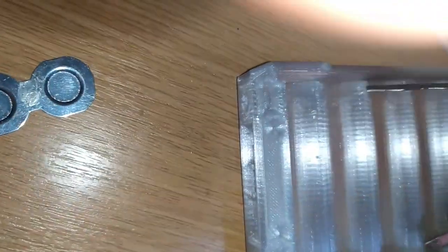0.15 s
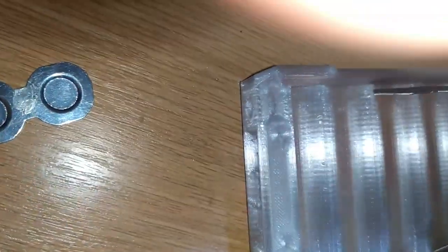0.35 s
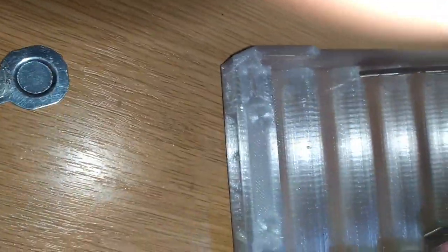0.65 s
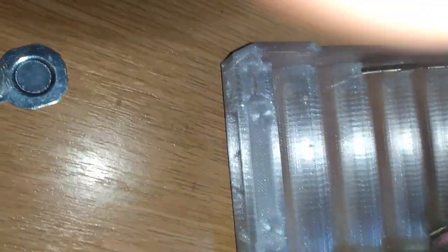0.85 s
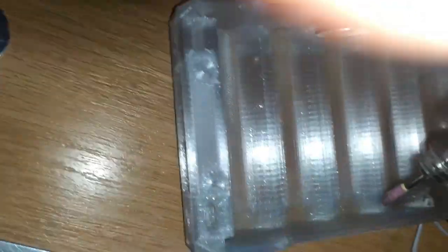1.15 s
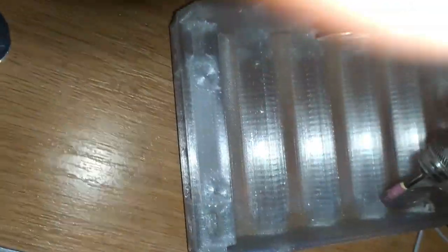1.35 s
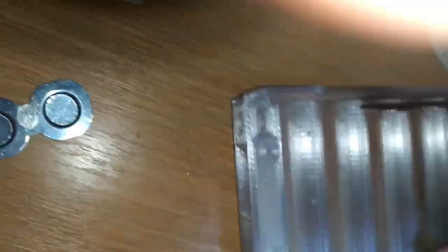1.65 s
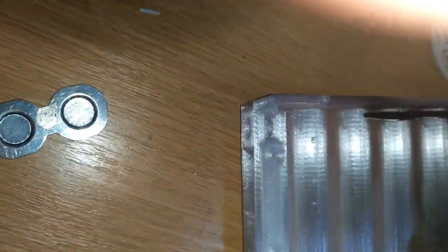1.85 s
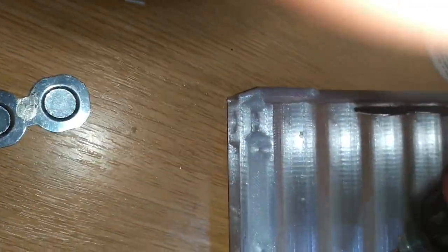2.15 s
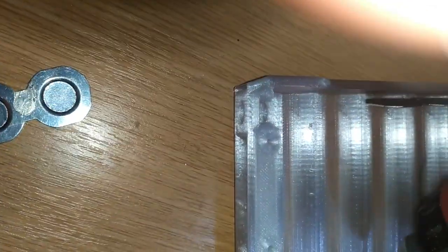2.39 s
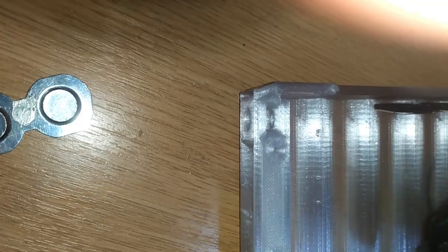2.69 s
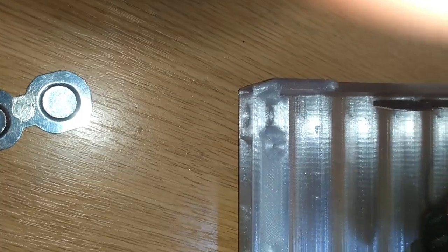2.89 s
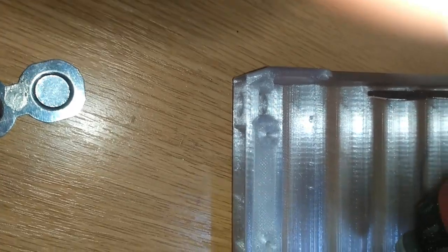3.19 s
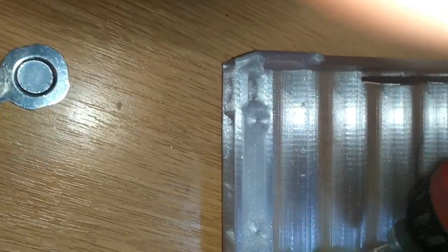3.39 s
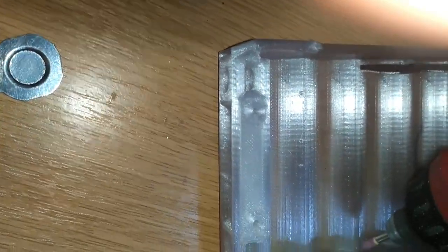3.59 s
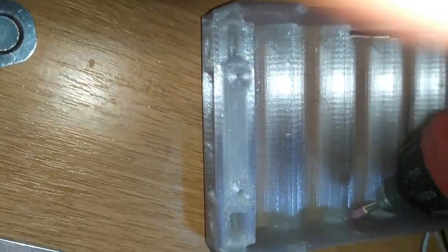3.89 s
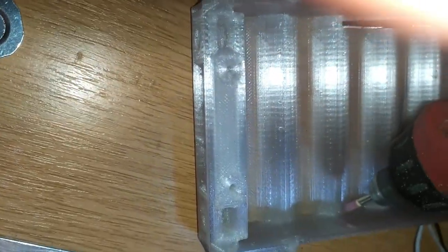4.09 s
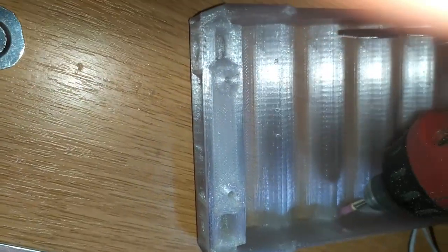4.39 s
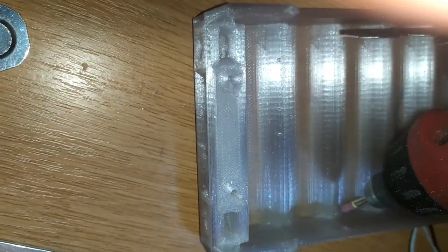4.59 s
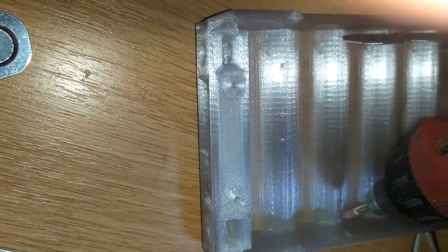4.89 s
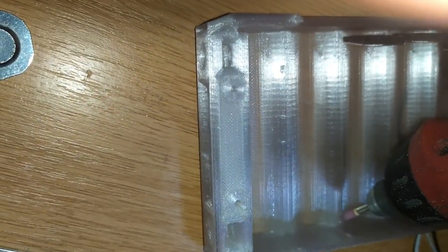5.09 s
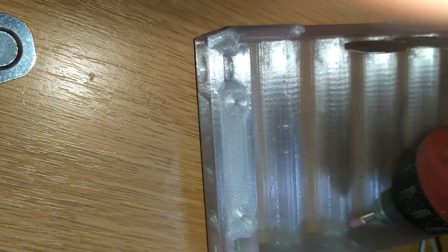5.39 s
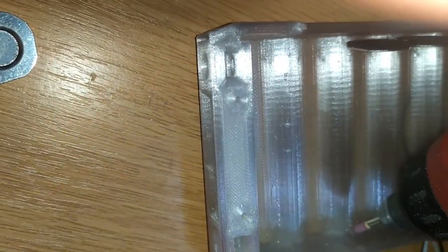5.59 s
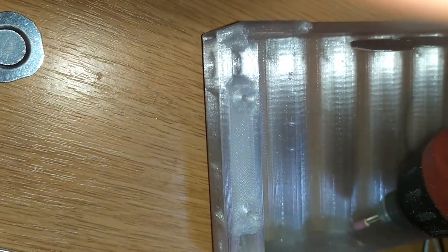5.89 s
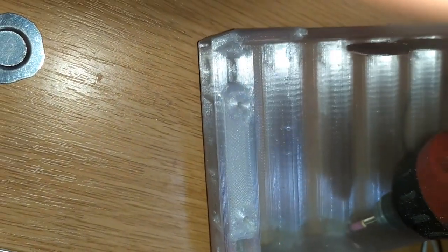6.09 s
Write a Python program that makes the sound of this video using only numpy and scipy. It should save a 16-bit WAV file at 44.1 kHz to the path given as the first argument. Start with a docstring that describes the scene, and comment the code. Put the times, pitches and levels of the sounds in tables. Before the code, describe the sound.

A small handheld motor snaps on with a gust of air, climbs to a raspy, buzzing whine, and its stone rasps plastic in two bursts.

```python
"""Small grinding tool over a bench

After some handling and a few clicks, a small rotary tool crackles into life and whines up to about
430 turns a second, puffing air at the left microphone; its stone is then pressed twice on a plastic shell.
Tones locked to one shaft angle make the whine and the knocking of the stone. Coloured noise makes the
brushes, air and room; scattered tiny impacts add sparks and chips, and short snaps and rings the clicks."""
import sys
import numpy as np
from scipy import signal
from scipy.fft import rfft, irfft
from scipy.io import wavfile
from scipy.ndimage import uniform_filter1d

SR = 44100
rng = np.random.default_rng(int(sys.argv[2]) if len(sys.argv) > 2 else 0)


def pcm_store(signal):
    """Save signal as 16-bit PCM."""
    levels = np.round(np.clip(np.atleast_2d(signal), -1, 1) * 32767)
    wavfile.write(sys.argv[1], SR, levels.astype(np.int16).T)


N = 275625
TIME = np.arange(N) / SR  # seconds

# All colours are relative levels, because the noise is levelled afterwards or the filter peak is set to 1.
# colour of the quiet room: [f/Hz, left level/dB, right level/dB]
ROOM_COLOUR = [(25, -33, -9), (48, 5, 0), (70, 2, -10), (100, -8, 1), (140, -19, -12.5), (220, -16, -14),
               (400, -22.5, -24), (1000, -30, -29), (16000, -37, -34)]
# colour of the draught: [f/Hz, left level/dB, right level/dB]
DRAUGHT_COLOUR = [(20, -45, -62), (38, -16, -27), (63, 7.5, -26), (109, 0, -15), (204, -6.5, -38),
                  (400, -20.5, -47), (1000, -54, -63)]
# tilt of the hand-held tool; it lifts the right side of the whine and lowers hum and draught: [t/s, tilt/dB]
TOOL_TILT = [(1.4, -1), (2.3, 2), (2.8, 0), (3.95, -2), (4.5, -4), (5.3, 0.5), (5.62, -7), (6.25, -3.5)]
# fingers slide on the shell: [middle t/s, half length/s, relative level/dB]
FINGER_SLIDES = [(0.025, 0.033, -52.5), (.205, .018, -63), (.4, .42, -77), (.57, 0.066, -67.5),
                 (.98, .1, -72)]
# colour of the rubbing: [f/Hz, left level/dB, right level/dB]
RUB_COLOUR = [(200, -15, -7), (1200, -11, -10), (2300, -10, -5), (3500, -3, 2), (5000, -9, -8),
              (8000, -3, -4), (15000, -11, -14)]
# soft bumps of the hand: [t/s, peak level/dB, f/Hz, time to fall by 60 dB/s]
HAND_BUMPS = [(.232, -53, 318, 0.049), (1.044, -44, 105, 0.083)]
# clicks of plastic, switch and first brush sparks:
# [t/s, peak level/dB, left minus right/dB, ring level against the snap/dB, time to fall by 60 dB/s]
CLICKS = [(.251, -49, -6, -12, .02), (.333, -49, 2, -10, .02), (.411, -53, -12, -7, 0.036),
          (0.562, -42, -1, -12, .03), (.841, -54, -8, -6, .04), (.901, -38, 13, -3, .025),
          (0.9093, -32.5, 12, 1, 0.024), (0.9124, -16.5, 9, -20, 0.055), (.9742, -24, -23, -29, .012),
          (1.033, -42, -12, -12, .02), (1.0427, -25, -23, -29, 0.045), (1.244, -46.5, -8, -16, .02),
          (1.326, -48, -7, -11, 0.04), (1.398, -23.5, 4, -7, 0.036), (1.4235, -20, 1, -22, .02),
          (1.433, -16, -5, -11, 0.024), (1.4433, -15.5, -15, -21, 0.017), (1.4645, -28, 2, -32, .02),
          (1.4747, -5, 4, -18, .02)]
# colour of the clicks: [f/Hz, left level/dB, right level/dB]
CLICK_COLOUR = [(100, -29, -12), (600, -23, 1), (1500, -12, 4), (2780, 4, 7.5), (5000, 0.5, -2),
                (8000, 3, -6), (11900, -2.5, -8), (16000, -17, -13)]
# the shaft gathers speed in a quick, a slow and a creeping stage: [gain/turns per s, time constant/s]
SPIN_UP_STAGES = [(245.44, .132), (165.27, .6208), (49.64, 9.0)]
# resonances and a dead spot of the housing, swept by the vane whistle: [f/Hz, half width/Hz, lift/dB]
HOUSING_LIFTS = [(4050, 280, 15), (5450, 360, -4), (5830, 115, 11.5)]
# colour of brushes and fan: [f/Hz, left level/dB, right level/dB]
RUSH_COLOUR = [(30, -70.5, -102), (120, -79, -68.5), (197, -69.5, -75), (289, -62, -69), (550, -66.5, -64),
               (700, -51.5, -61.5), (920, -57.5, -59.5), (1380, -57, -52), (2330, -54, -50),
               (2490, -57.5, -55), (2980, -53.5, -46), (4020, -49.5, -48.5), (5260, -55.5, -55.5),
               (6560, -50.5, -50.5), (6880, -57.5, -56.5), (8200, -51, -52.5), (9500, -59, -57.5),
               (10200, -61, -60.5), (15900, -63.5, -67)]
# colour of the sparks: [f/Hz, left level/dB, right level/dB]
SPARK_COLOUR = [(300, -47, -51), (730, -8, -4), (2000, 0, -7.5), (4000, -3, -20), (6000, -20, -2),
                (8700, 8.5, 5), (11000, 0.5, -3), (13500, -1.5, -12), (16000, -2, -33)]
# overtones of the shaft, levels within the whine:
# [multiple (rounded in use), left level/dB, right level/dB, own fall at half speed/dB]
SHAFT_OVERTONES = [(1.85, -30.5, -32.5, 5), (3.04, -34.5, -28.5, 6), (4, -32.5, -27.5, 10),
                   (5, -30.5, -30.5, 9), (6, -29, -29, -1.5), (7, -37, -18, 45), (8, -22.5, -27, 19),
                   (9, -30, -32, -3), (11, -29.5, -34, 15), (14, -28, -41, 38), (17, -32, -49, 10),
                   (19, -40, -48, 20), (20, -47, -45, 20), (22, -31, -30, 22), (23, -32.5, -49, 18),
                   (24, -35, -34.5, -4)]
# the stone is pressed on the plastic: [start t/s, end t/s, attack/s, pressure 0-1]
PRESSES = [(4.74, 5.396, .018, 0.45), (5.778, 6.25, 0.42, 0.44)]
# the stone catches and tears out more: [middle t/s, half length/s, added pressure]
BITES = [(4.752, 0.013, .35), (5.02, .05, .15), (5.133, 0.025, 0.22), (5.22, 0.031, 0.36),
         (5.408, .014, 0.22), (6.035, 0.027, .25), (6.203, .022, 0.33)]
# how hard the stone chatters, one list for each press: [t/s, relative level/dB]
CHATTER = [
    [(4.73, -30), (4.75, -30), (4.784, -31), (4.832, -26), (4.978, -22.5), (5.058, -26), (5.08, -45),
     (5.11, -39), (5.172, -49), (5.204, -40), (5.394, -22.5), (5.442, -38), (5.47, -30)],
    [(5.78, -40), (5.818, -38), (5.852, -36), (5.886, -26), (5.962, -37), (6.004, -26), (6.078, -28),
     (6.1, -24.5), (6.174, -38), (6.25, -23)],
]
# overtones of the stone knocking once a turn: [multiple, left level/dB, right level/dB], before the chatter
KNOCK_OVERTONES = [(3, -31.5, -25.5), (4, -27.5, -24.5), (5, -23.5, -15), (6, -27, -32), (7, -42, -25),
                   (9, -49, -27), (12, -27, -35), (14, -39, -34), (15, -28, -44), (18, -23.5, -39),
                   (22, -27, -34)]
# colour of tearing chips: [f/Hz, left level/dB, right level/dB]
CHIP_COLOUR = [(185, -14.5, -4.5), (315, 4.5, -2), (438, -33, 3), (795, -14, 2.5), (1430, 2, -7.5),
               (1870, 6, 20), (2160, 10, 1), (2740, -6, 6.5), (3560, -47, -25), (5240, -14, 11.5),
               (6760, 6, 5.5), (8200, 7, 12), (9900, 4, 8.5), (11200, -6, -1), (16000, -25, -15)]

# one gust: the fan's jet sweeps across the left microphone and makes its air cavity swing
GUST_S, GUST_DB, GUST_ATTACK_S, GUST_FADE_DB_PER_S = 1.552, -22, 0.0051, 229
# the swing is set against the gust level
SWING_HZ, SWING_LEFT_DB, SWING_RIGHT_DB = 62.5, 5, -25
# for each part: level at full speed, and the fall towards standstill
DRAUGHT_DB, DRAUGHT_FALL_DB = -45, 11
VANES_DB, VANES_FALL_DB = -30, 19.5
RUSH_DB, RUSH_FALL_DB, RUSH_PRESSED_DB = -14.5, 19.5, -0.4  # last one: change at pressure 1
WHINE_DB, WHINE_FALL_DB = -0.47, 96
# unbalance hum at full speed, and the power of the speed that it grows with
HUM_DB, HUM_POWER = -25, 3.24
# share of the tool's tilt that hum and draught follow
HUM_TILT_SHARE, DRAUGHT_TILT_SHARE = 0.36, 0.81
# full speed is in turns per second
SWITCH_ON_S, SHAFT_STARTS_S, FULL_SPEED = 1.384, 1.406, 432
# the first long press drags the shaft down a little
SAG_AT_S, SAG_WIDTH_S, SAG_TURNS_PER_S = 5.37, .27, 4.1
# the motor noise swells in after switching on
START_DEPTH_DB, START_SWELL_S = 28, 0.023
# phase shake of the vane whistle in radians: at full speed, and added at standstill
VANES_ROUGH, VANES_ROUGH_SLOW = .6, 3.6
# sparks follow the motor current and a power of the speed
SPARKS_DB, SPARKS_POWER = -6.5, 2.02
# commutator buzz within the whine: level of the lowest tone, fall from one to the next, waver of each
BUZZ_DB, BUZZ_STEP_DB, BUZZ_WAVER_DB = -51, .45, 2.5
LEFT_EARLIER_S = 0.0003965  # the left microphone is nearer to the tool
BENCH_ECHO_DB = -16  # each echo of the rush, against the direct sound
RELEASE_S = 0.2  # the stone lets go
CHATTER_GAIN_DB = 23
CUTOFF_HZ = 15800


def from_db(db):
    """Turn decibels into a plain gain."""
    return np.exp(np.asarray(db) * (np.log(10) / 20))


def rms_one(x):
    """Scale a sound to unit power."""
    return x / np.sqrt(np.mean(x ** 2) + 1e-20)


def swell(middle_s, width_s):
    """A smooth rise and fall of height 1."""
    return np.exp(-((TIME - middle_s) / width_s) ** 2)


def drift(rate):
    """Smooth random wander of spread 1 that changes about rate times a second."""
    # draw every 40th sample only, and drop the filter's first 2000 values while it settles
    pole = np.exp(-80 * np.pi * rate / SR)
    noise = rng.standard_normal(N // 40 + 2002)
    slow = signal.lfilter([1], [1, -2 * pole, pole * pole], noise)[2000:]
    return np.interp(np.arange(N) / 40, np.arange(len(slow)), rms_one(slow))


def stereo_noise():
    """Independent hiss on each side."""
    return rng.standard_normal((2, N))


def response(colour, size=8192):
    """Turn a left and right colour into filters that act without delay (minimum phase)."""
    hz, *sides = np.transpose(colour)
    grid = np.log(np.maximum(np.arange(size // 2 + 1) * SR / size, 1))
    curves_db = [np.interp(grid, np.log(hz), side) for side in sides]
    cepstrum = irfft(np.log(from_db(curves_db)))
    # fold the later half onto the earlier one, so nothing sounds before the hit
    cepstrum[:, 1:size // 2] *= 2
    cepstrum[:, size // 2 + 1:] = 0
    return irfft(np.exp(rfft(cepstrum)))


def through(x, impulse):
    """Filter both channels."""
    return signal.fftconvolve(x, impulse, axes=1)[:, :N]


def resonance(x, hz, width_hz):
    """One resonance that rings around hz, with gain 1 on top."""
    r = np.exp(-np.pi * width_hz / SR)
    feed = np.array([1, 0, -1]) * (1 - r * r) / 2
    return signal.lfilter(feed, [1, -2 * r * np.cos(2 * np.pi * hz / SR), r * r], x)


def grains(per_s, spread_db):
    """Random tiny impacts of uneven size, reaching the two microphones differently."""
    sizes = from_db(spread_db * np.minimum(rng.exponential(1, N), 4)) * stereo_noise()
    return rms_one(sizes * (rng.random(N) < per_s / SR))


def bench(x, echo_db, longest_s, count=10):
    """Early echoes off bench, shell and hand ripple the spectrum, differently on each side."""
    out = x.copy()
    for side in range(2):
        shares = rng.uniform(.1, 1, count)
        signs = rng.choice([-1, 1], count)
        for share, sign in zip(shares, signs):
            lag = 1 + int(share * longest_s * SR)
            out[side, lag:] += sign * from_db(echo_db) * x[side, :-lag]
    return rms_one(out)


def overtone(angle, left_db, right_db, waver_db, slip, slip_rate, lead=np.pi / 2):
    """A tone whose strength wavers and whose phase shakes; the left leads by some radians."""
    phase = angle + slip * drift(slip_rate) + rng.uniform(0, 2 * np.pi)
    strength = np.sqrt(2) * from_db(waver_db * drift(5.8))
    left = from_db(left_db) * np.sin(phase)
    right = from_db(right_db) * np.sin(phase - lead)
    return strength * np.array([left, right])


def tilt_db():
    """Tilt of the tool at every sample."""
    s, tilt = np.transpose(TOOL_TILT)
    return np.interp(TIME, s, tilt)


def shaft_speed():
    """Turns per second: the motor closes in on its top speed and sags under load."""
    age = np.maximum(TIME - SHAFT_STARTS_S, 0)
    free = sum(gain * (1 - np.exp(-age / lag_s)) for gain, lag_s in SPIN_UP_STAGES)
    return np.maximum(free - SAG_TURNS_PER_S * swell(SAG_AT_S, SAG_WIDTH_S), 0)


def slowness(speed):
    """1 at standstill, 0 at full speed; the motor current follows it."""
    return np.clip(1 - speed / FULL_SPEED, 0, 1)


def pressure():
    """Each press builds up, holds and lets go; now and then the stone bites deeper."""
    held = 0
    for start, end, attack_s, force in PRESSES:
        letting_go = np.exp(-np.maximum(TIME - end, 0) / RELEASE_S)
        held += force * np.clip((TIME - start) / attack_s, 0, 1) * letting_go
    return held + sum(force * swell(s, width_s) for s, width_s, force in BITES)


def room():
    """The low rumble of the quiet room: steady coloured noise."""
    return from_db(-62.5) * rms_one(through(stereo_noise(), response(ROOM_COLOUR)))


def draught(speed):
    """Lumpy air noise from the fan, growing with its speed, and one gust that swings an air cavity."""
    level_db = DRAUGHT_DB - DRAUGHT_FALL_DB * slowness(speed) - DRAUGHT_TILT_SHARE * tilt_db()
    steady = (speed > 0) * from_db(level_db)
    age = TIME - GUST_S
    rise = np.exp(np.minimum(age, 0) / GUST_ATTACK_S)
    gust = rise * from_db(GUST_DB - GUST_FADE_DB_PER_S * np.maximum(age, 0))
    swing = from_db([[SWING_LEFT_DB], [SWING_RIGHT_DB]]) * np.cos(2 * np.pi * SWING_HZ * age)
    noise = rms_one(through(stereo_noise(), response(DRAUGHT_COLOUR)))
    return (steady + gust) * from_db(2.2 * drift(15)) * noise + gust * swing


def handling():
    """Fingers rub, stick and bump on the plastic before the motor starts."""
    rub = sum(from_db(level_db + 1) * swell(s, width_s) for s, width_s, level_db in FINGER_SLIDES)
    out = rub * rms_one(through(stereo_noise(), response(RUB_COLOUR)))
    # while the grip shifts, small slips make the shell tick
    ticks = resonance(grains(220, spread_db=2.0), hz=2390, width_hz=760)
    slips = rms_one(resonance(ticks, hz=3200, width_hz=2700))
    out += from_db(-76) * slips * np.clip((.85 - TIME) / .15, 0, 1)
    for s, peak_db, hz, t60 in HAND_BUMPS:
        age = np.clip(TIME - s, 0, 1)
        out += from_db(peak_db - 60 * age / t60) * np.sin(2 * np.pi * hz * age)
    return out


def clicks():
    """Each click is a sharp snap and a short rattling ring."""
    out = np.zeros((2, N))
    age = TIME[:SR // 5]
    for s, peak_db, pan_db, ring_db, t60 in CLICKS:
        hit = from_db(ring_db - 60 * age / t60) * rng.standard_normal((2, len(age))) / 2
        hit[:, 0] = 1  # the snap
        side_db = peak_db + np.array([[pan_db], [-pan_db]]) / 2
        start = int(s * SR)
        out[:, start:start + len(age)] += hit * from_db(side_db)
    snap = response(CLICK_COLOUR)
    return through(out, snap / np.abs(snap).max())


def vanes(angle, speed, count=16):
    """The raspy whistle of the fan vanes flares as it sweeps through the housing's resonances."""
    slow = slowness(speed)
    lift_db = sum(db / (1 + ((count * speed - hz) / width_hz) ** 2) for hz, width_hz, db in HOUSING_LIFTS)
    level_db = VANES_DB - VANES_FALL_DB * slow + lift_db
    rough = VANES_ROUGH + VANES_ROUGH_SLOW * slow
    return overtone(count * angle, level_db, level_db, waver_db=3.5, slip=rough, slip_rate=58, lead=1.23)


def brushes(angle, speed):
    """A rush of brushes and air that pulses with every turn, with bright sparks while the motor labours."""
    slow = slowness(speed)
    # brushes bear hardest at one part of each turn
    bearing = from_db(2.0 * np.cos(angle) + 1.0 * np.cos(2 * angle + 1) + .5 * drift(27))
    straight = rng.standard_normal(N)
    # the same noise reaches the right a little later
    direct = np.array([straight, np.interp(TIME - LEFT_EARLIER_S, TIME, straight)])
    specks = from_db(-8.5) * grains(12 * speed + 300, spread_db=1.5)
    friction = bearing * (stereo_noise() + from_db(-5.0) * direct + specks)
    coloured = rms_one(through(friction, response(RUSH_COLOUR)))
    rush = bench(coloured, echo_db=BENCH_ECHO_DB, longest_s=.006, count=6)
    # the housing sings at low speed
    ringing = from_db(-3) * rms_one(resonance(friction, hz=3980, width_hz=110))
    housing = np.clip(1 - speed / 300, 0, 1) * ringing
    crackle = bearing * grains(3000 + 40 * speed, spread_db=-3.0)
    spark_level = from_db(SPARKS_DB) * slow * (1 - slow) ** SPARKS_POWER
    sparks = spark_level * rms_one(through(crackle, response(SPARK_COLOUR)))
    rush_db = RUSH_DB - RUSH_FALL_DB * slow + RUSH_PRESSED_DB * pressure()
    return from_db(rush_db) * (rush + housing) + sparks


def whine(angle, speed):
    """Unbalance hum, overtones of the shaft and the high buzz of the commutator."""
    tilt, slow = tilt_db(), slowness(speed)
    hum_level = from_db(HUM_DB - HUM_TILT_SHARE * tilt) * (speed / FULL_SPEED) ** HUM_POWER * np.sqrt(2)
    hum = hum_level * np.array([from_db(2.5) * np.sin(angle), from_db(-9.0) * np.sin(angle - .7)])
    # most upper overtones only meet the housing's resonances near full speed
    tones = 0
    for multiple, left_db, right_db, fall_db in SHAFT_OVERTONES:
        lead = min(0.63 * multiple, np.pi / 2)
        tone = overtone(np.round(multiple) * angle, left_db, right_db,
                        waver_db=2.0, slip=0.23, slip_rate=65, lead=lead)
        tones += from_db(-fall_db * 2 * slow) * tone
    tones *= from_db(tilt * np.array([[0], [1]]))  # right side only
    # the buzz: overtones that lie above 10 kHz near full speed
    for step, multiple in enumerate(range(25, 37)):
        level_db = BUZZ_DB - BUZZ_STEP_DB * step
        lead = 2 * np.pi * multiple * speed * LEFT_EARLIER_S
        tones += overtone(multiple * angle, level_db, level_db - 9.0,
                          waver_db=BUZZ_WAVER_DB, slip=.3, slip_rate=110, lead=lead)
    return hum + from_db(WHINE_DB - WHINE_FALL_DB * slow ** 2) * tones


def grinding(angle):
    """The stone chatters once a turn, its grit tears off chips, and the shell adds its echoes."""
    chatter = 0
    for s, level_db in map(np.transpose, CHATTER):
        chatter += np.interp(TIME, s, from_db(level_db + CHATTER_GAIN_DB), left=0, right=0)
    chatter = uniform_filter1d(chatter, size=400)  # smooth over about 9 ms
    knock = 0
    for multiple, left_db, right_db in KNOCK_OVERTONES:
        knock += overtone(np.round(multiple) * angle, left_db, right_db,
                          waver_db=2.5, slip=0.38, slip_rate=70)
    # the grit bites hardest at one part of each turn
    bite = from_db(2.0 * np.cos(angle) + 2.5 * drift(35))
    chips = rms_one(through(bite * grains(20000, spread_db=-2.5), response(CHIP_COLOUR)))
    echoed = bench(chips, echo_db=-13.0, longest_s=.005, count=6)
    return chatter * knock + pressure() * from_db(-12.5) * echoed


def scene():
    """One shaft angle drives motor and stone."""
    speed = shaft_speed()
    # the speed trembles very slightly
    angle = 2 * np.pi * np.cumsum(speed * (1 + 0.000504 * drift(8.14))) / SR
    age = np.maximum(TIME - SWITCH_ON_S, 0)
    switched_on = (age > 0) * from_db(-START_DEPTH_DB * np.exp(-age / START_SWELL_S))
    motor = switched_on * (vanes(angle, speed) + brushes(angle, speed) + whine(angle, speed))
    return room() + draught(speed) + handling() + clicks() + motor + grinding(angle)


def record(dry):
    """Peaks stop at full scale and the top is cut."""
    top_cut = signal.ellip(12, .1, 80, CUTOFF_HZ, fs=SR, output="sos")
    return signal.sosfilt(top_cut, np.clip(dry, -1, 1))


dry = scene()
out = record(dry)
pcm_store(out)
```